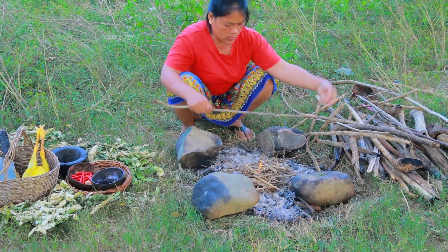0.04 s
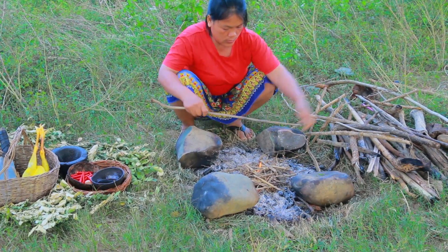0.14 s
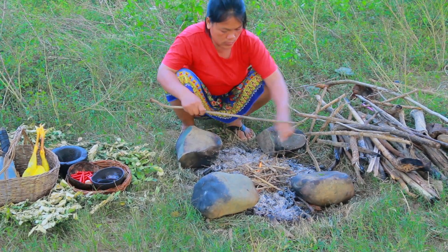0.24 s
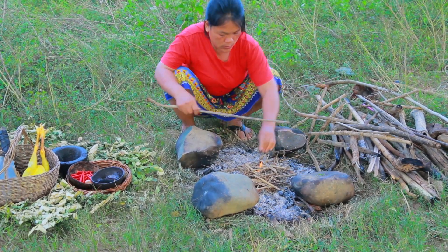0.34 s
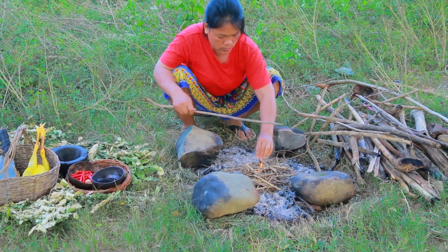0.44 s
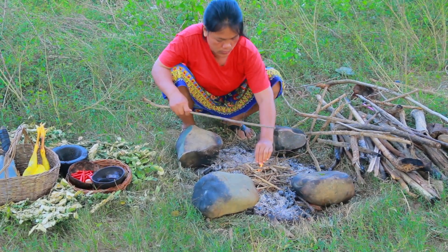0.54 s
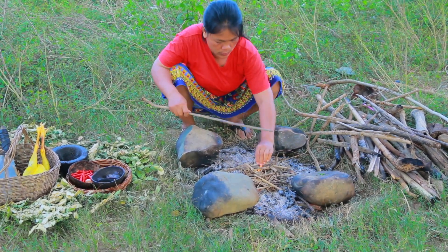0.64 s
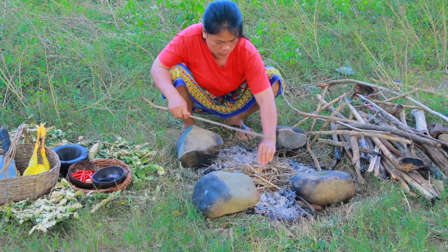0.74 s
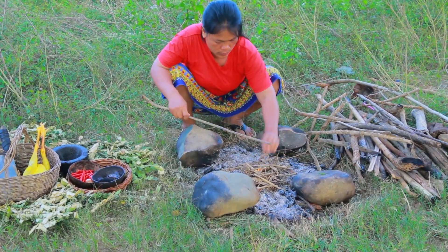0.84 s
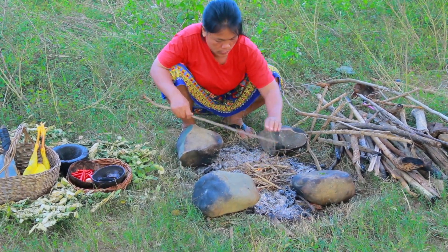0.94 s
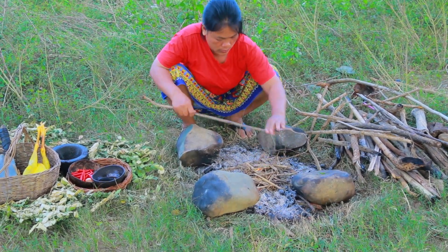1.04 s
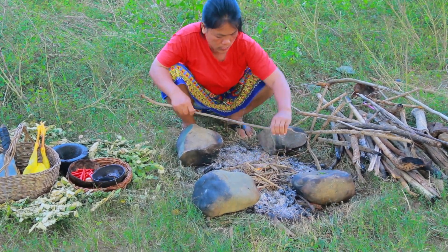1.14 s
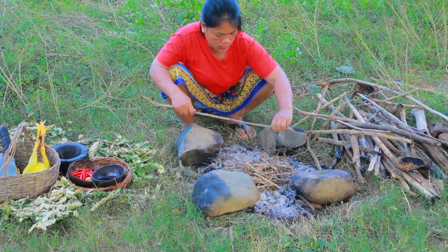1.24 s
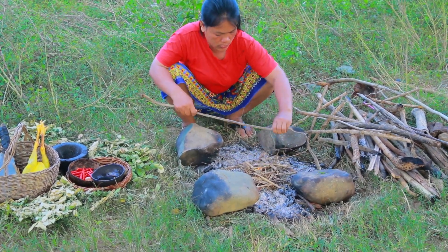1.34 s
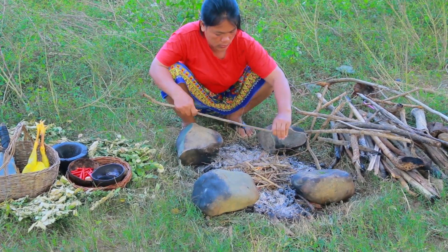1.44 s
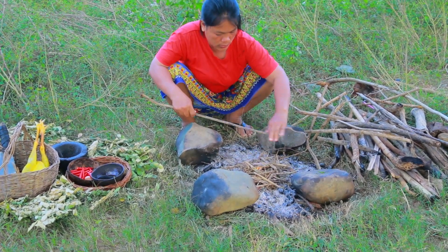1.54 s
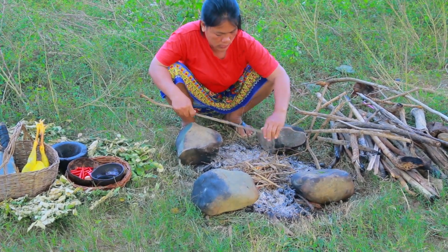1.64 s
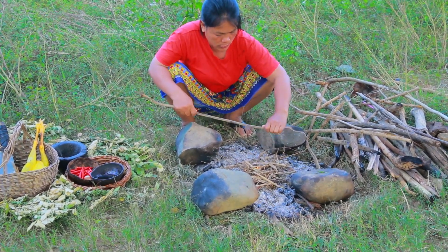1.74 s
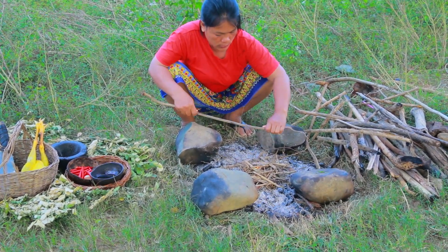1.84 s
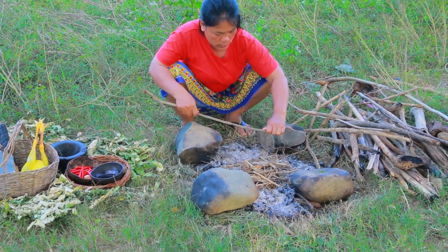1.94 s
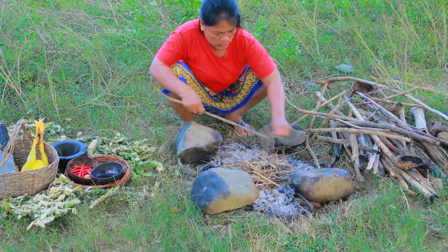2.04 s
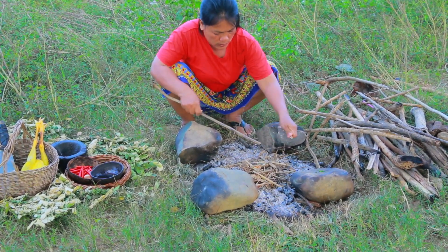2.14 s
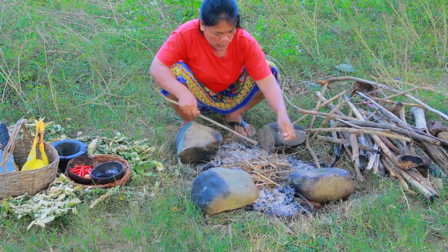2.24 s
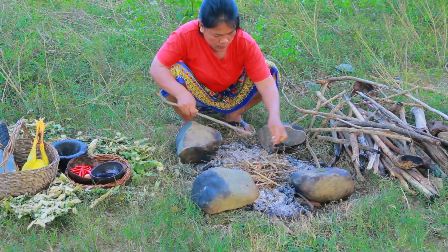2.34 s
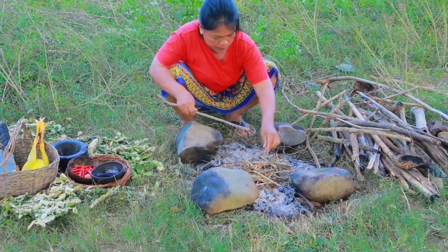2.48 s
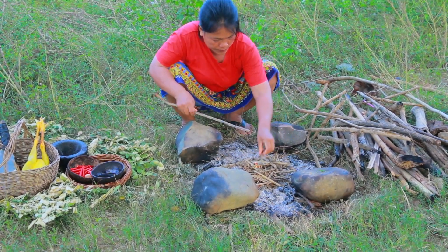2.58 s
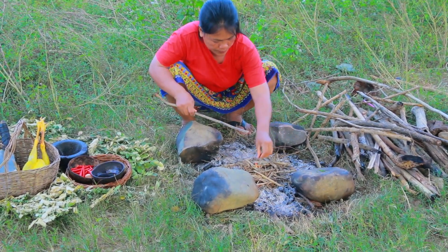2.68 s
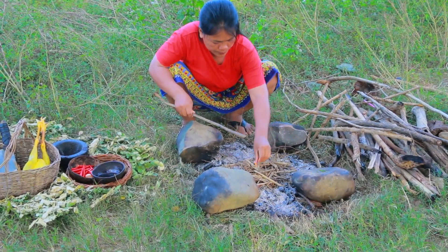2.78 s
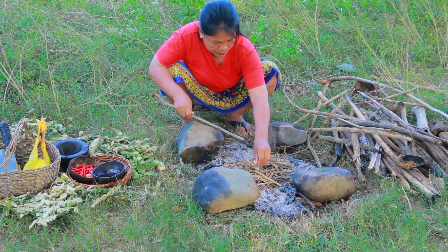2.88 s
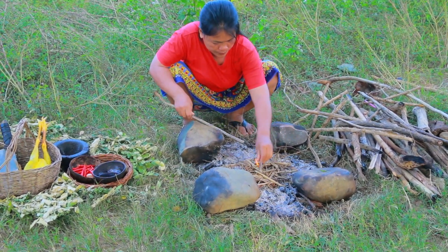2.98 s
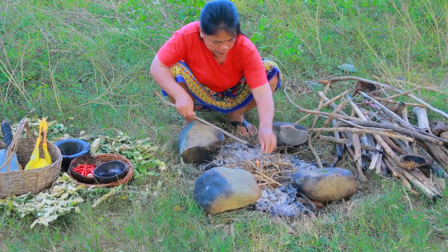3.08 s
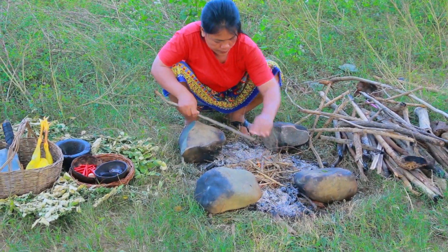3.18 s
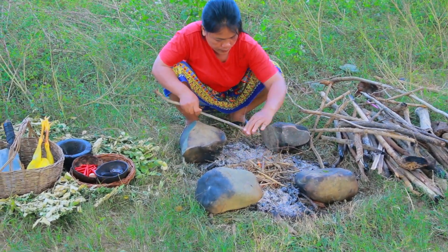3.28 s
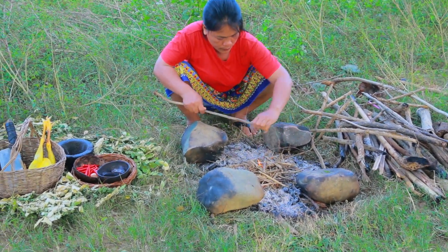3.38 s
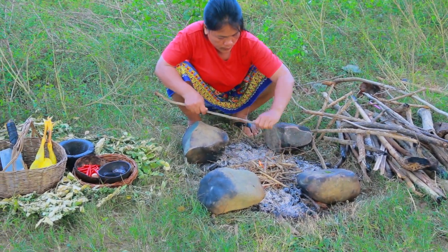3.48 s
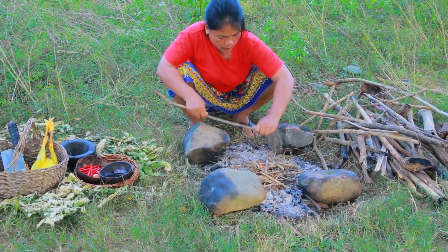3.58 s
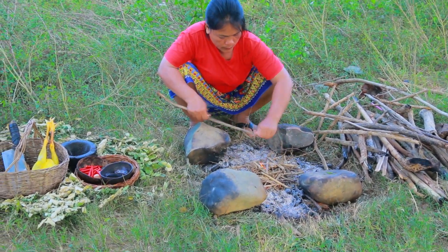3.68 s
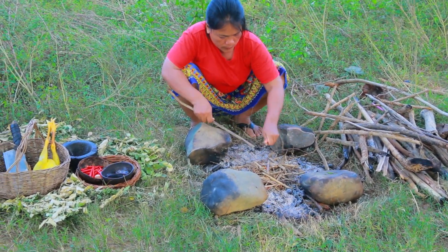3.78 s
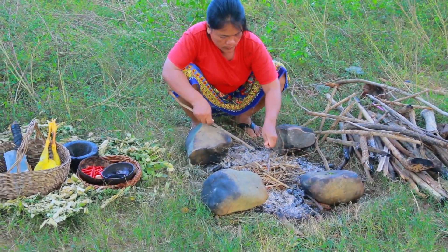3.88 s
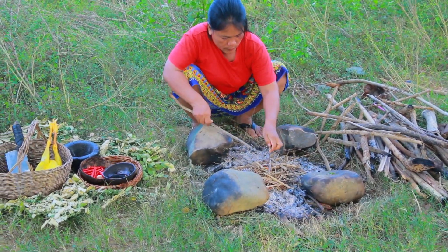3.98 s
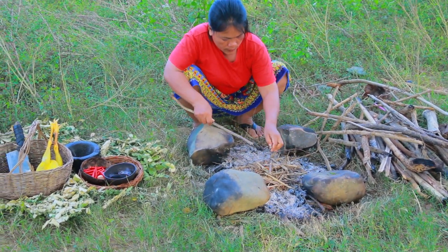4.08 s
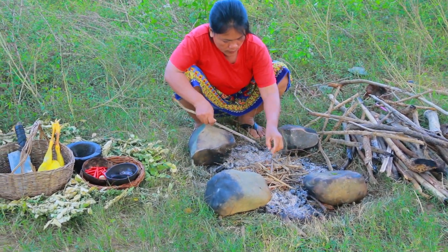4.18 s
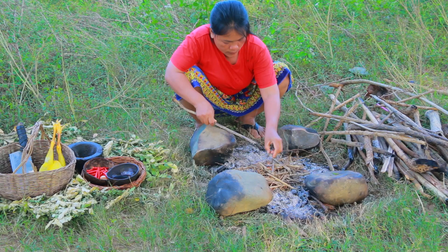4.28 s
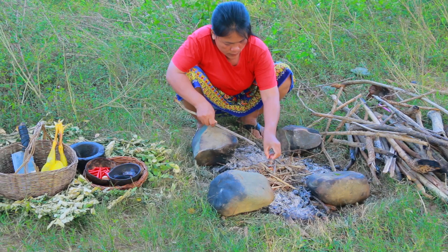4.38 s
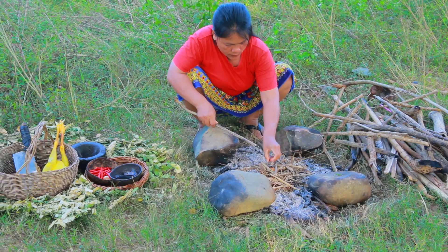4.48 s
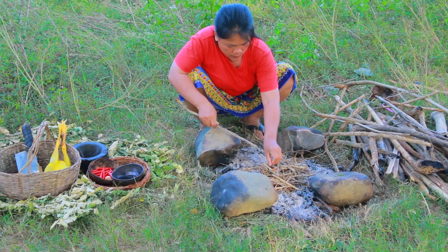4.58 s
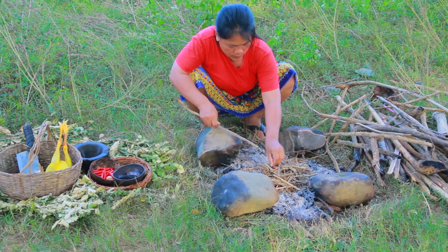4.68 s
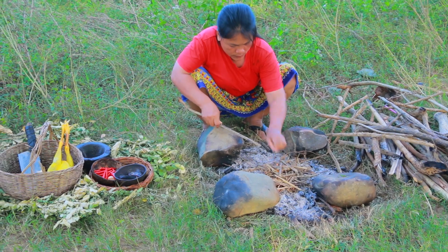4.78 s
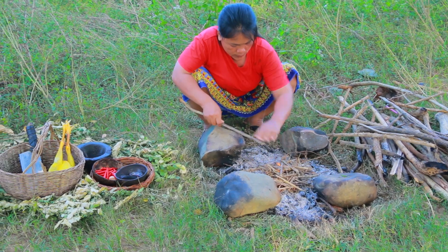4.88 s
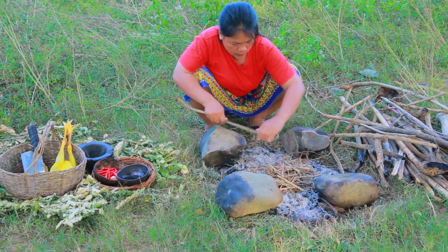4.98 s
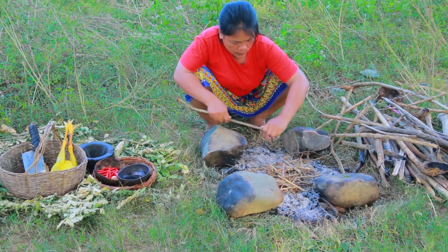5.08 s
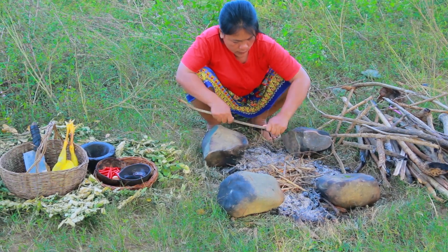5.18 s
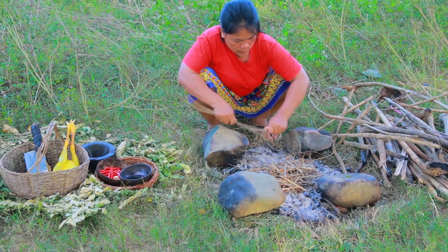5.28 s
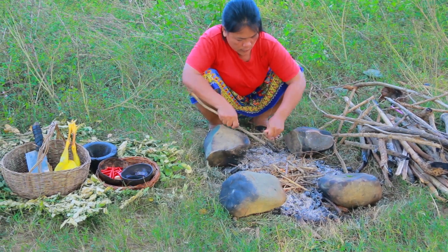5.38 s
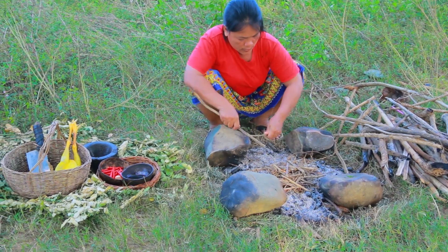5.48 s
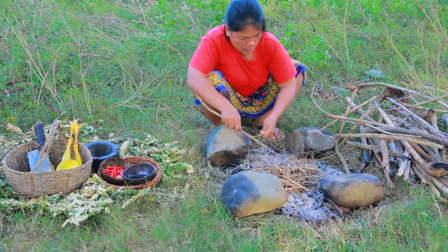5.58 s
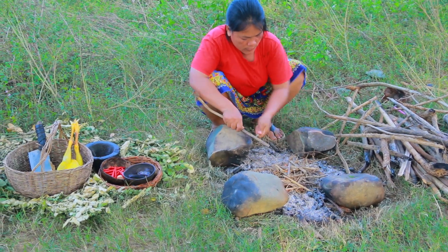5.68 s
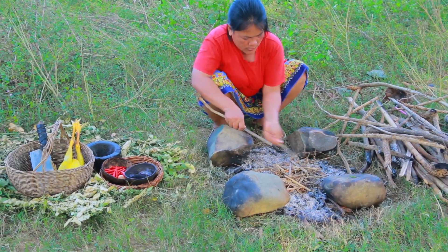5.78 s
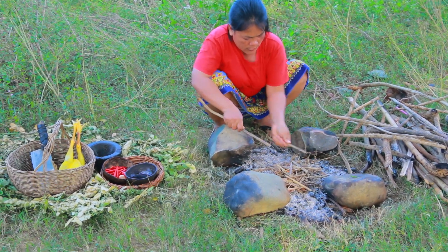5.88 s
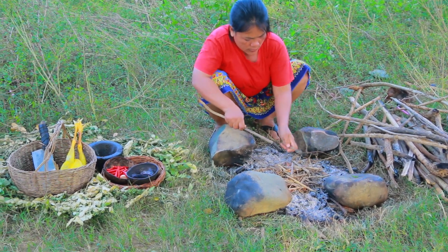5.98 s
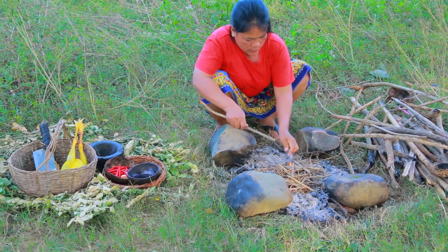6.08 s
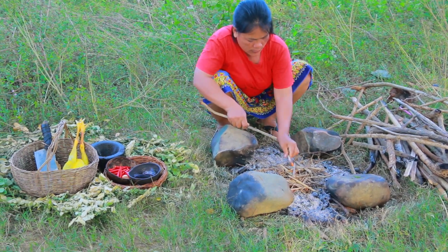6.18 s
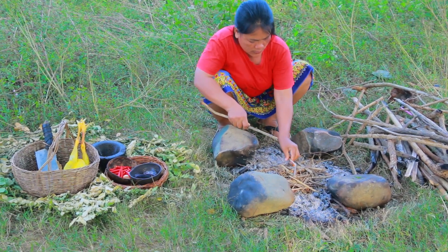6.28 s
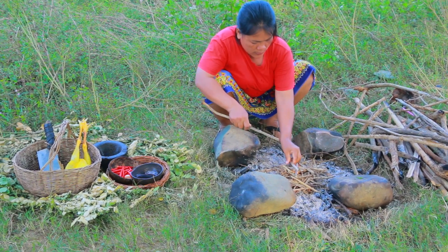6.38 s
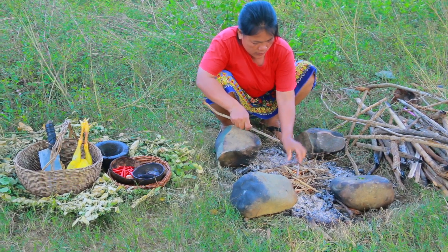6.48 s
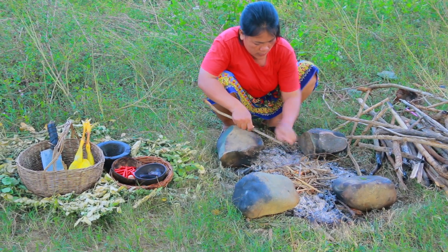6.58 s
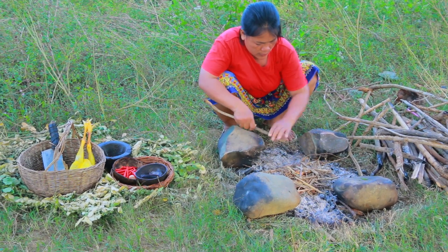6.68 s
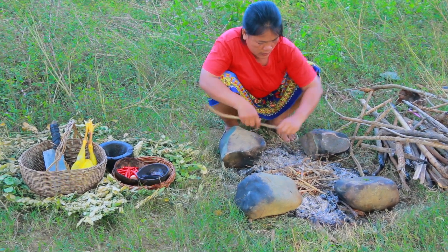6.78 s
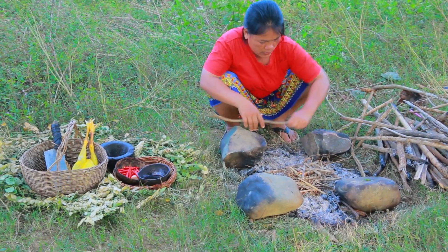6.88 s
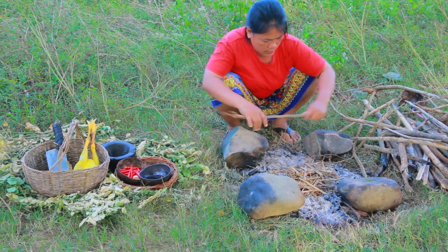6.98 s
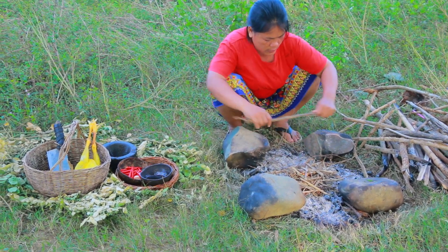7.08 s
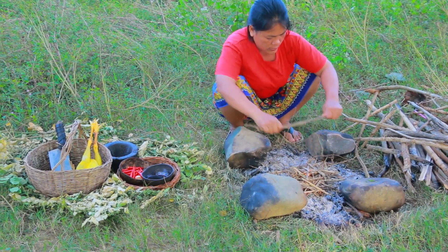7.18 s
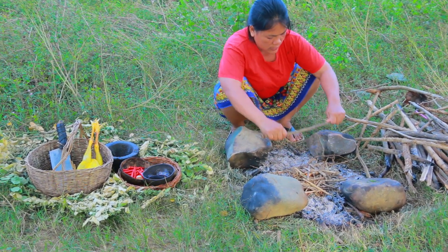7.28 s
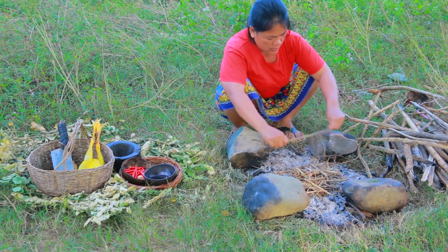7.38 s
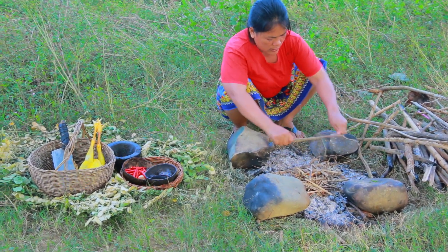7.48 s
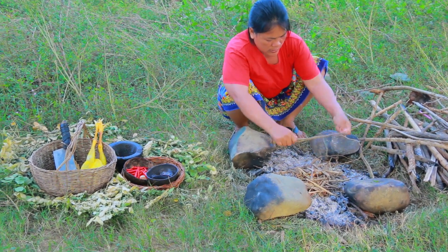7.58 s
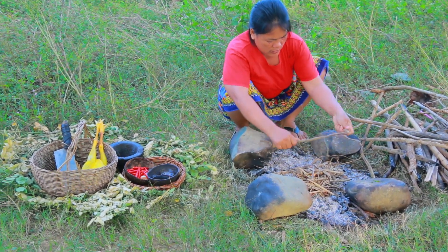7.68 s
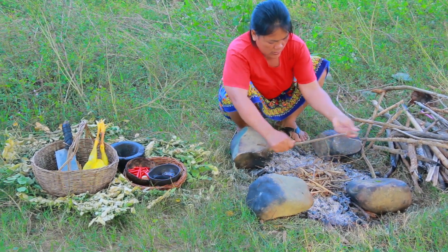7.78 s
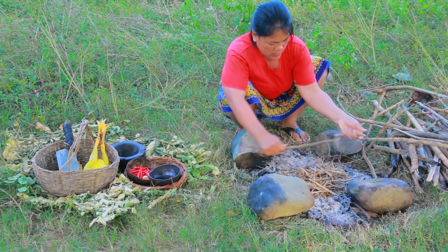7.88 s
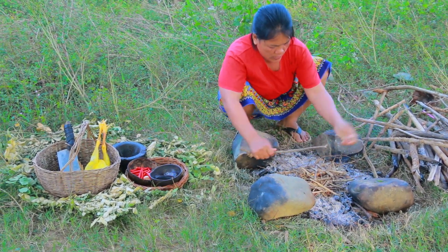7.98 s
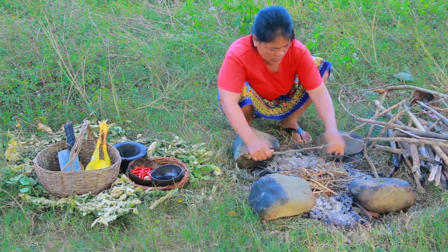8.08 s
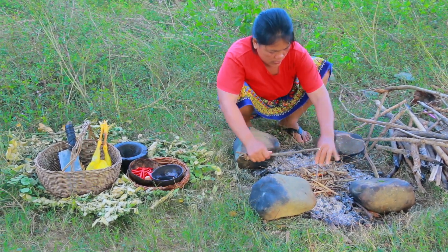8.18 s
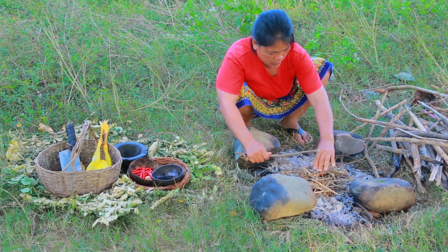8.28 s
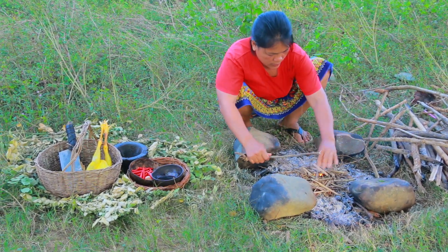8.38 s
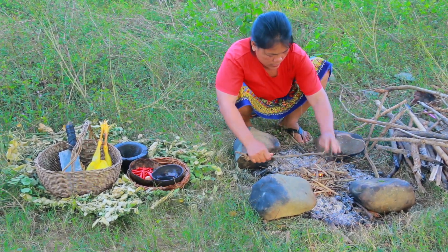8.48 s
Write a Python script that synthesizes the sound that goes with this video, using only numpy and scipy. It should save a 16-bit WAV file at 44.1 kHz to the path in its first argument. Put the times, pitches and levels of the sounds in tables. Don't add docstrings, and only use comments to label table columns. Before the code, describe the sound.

Outdoors in a grassy clearing, dry sticks are broken by hand slightly right of a stereo microphone. Low gusts bump the left side during the first two and a half seconds. A loud snap comes at two seconds, another near 3.7, a strong crack at 5.3 with a softer follower, and the hardest at 7.5. Small splinter ticks surround them over a continuous distant rush.

```python
import sys
import numpy as np
from scipy import signal
from scipy.fft import rfft, irfft, next_fast_len
from scipy.io import wavfile
from scipy.ndimage import uniform_filter1d

SR = 44100
rng = np.random.default_rng(int(sys.argv[2]) if len(sys.argv) > 2 else 0)


def persist_wave(psi):
    counts = np.round(np.clip(psi, -1, 1) * 32767).astype(np.int16)
    wavfile.write(sys.argv[1], SR, np.atleast_2d(counts).T)


def how_loud(loudness_db):
    steps = np.asarray(loudness_db, float) / 20
    return 10 ** steps


N = 376613
STICK_LEAN_DB = -2.6


def rms_one(x):
    return x / np.sqrt(np.mean(x ** 2) + 1e-20)


def in_time(rows):
    return np.interp(np.arange(N) / SR, *np.transpose(rows))


def at_hz(points, hz, column=1):
    points = np.array(points)
    return np.interp(np.log(hz + 1e-9), np.log(points[:, 0]), points[:, column])


def resonance(x, hz, width_hz):
    r = np.exp(-np.pi * width_hz / SR)
    poles = [1, -2 * r * np.cos(2 * np.pi * hz / SR), r * r]
    return signal.lfilter([(1 - r * r) / 2, 0, (r * r - 1) / 2], poles, x)


def butter(x, hz, kind, order=2):
    return signal.sosfilt(signal.butter(order, hz, kind, fs=SR, output="sos"), x)


def sticks():
    break_starts = [
        2.0437,
        3.7395,
        5.3311,
        5.4264,
        7.4572,
        3.743,
    ]
    # level_db before the limiter, tear_ms, fade_db over the tear, left_late_us, scatter_db
    tears = [
        (11, 3, -9.5, 9.5, 4),
        (-8.5, 1.8, 0, 14, 3),
        (-3.5, 2.72, -6.5, 15, 4.5),
        (-6.5, 2.6, -9, 13.7, 5.5),
        (13.5, 3.4, -17, 27, -2),
        (-4.5, 2.64, -8, 8.3, 5),
    ]
    # (hz, db)
    colours = [
        (11994, 1.5, [(1900, -13), (2500, -8), (3300, -6), (4300, -13.5), (5600, -3), (7800, -4), (10200, -3)]),
        (13700, -4.5, [(1500, -3), (4000, -23), (5400, -4.5), (7700, -6), (13800, -21.5)]),
        (11140, -0.5, [(2150, -11), (3550, -24), (5000, -12), (8400, -8), (13000, -23.5)]),
        (15000, -13, [(1500, -20.5), (3500, -16.5), (4900, -4), (6200, -4.5), (9700, 3), (14500, -12.5)]),
        (14660, -1.5, [(1600, -15), (3000, -11.5), (4600, -4), (6300, -5.5), (7900, -4), (13000, 3.5)]),
        (13600, 0, [(1500, -6), (2700, -12), (3200, -13), (7700, -6.5), (13800, -11)]),
    ]
    # start_s, peak_db, splinter_hz, splinter_db
    ticks = [(1.3028, -42, 6300, -9), (1.9674, -37.5, 9500, 0.5), (1.9743, -37.5, 9400, 0),
             (1.983, -24, 9090, -1), (1.9974, -36.5, 9400, 3.5), (2.0158, -29.5, 9360, 2),
             (2.0291, -29, 9450, 6), (2.8074, -49.5, 9000, -6), (3.5594, -48, 9000, -6),
             (3.666, -24, 5500, -15), (3.704, -21, 6900, -16.5), (3.7152, -30, 8000, -7),
             (4.3014, -49.5, 7500, -6), (5.0064, -52.5, 9000, -6.5), (5.0944, -45.5, 9000, -6),
             (5.2931, -19.5, 3210, -19), (5.3177, -23, 8300, -5), (5.3375, -16, 7900, -20.5),
             (5.504, -21.5, 7900, -18), (5.685, -25, 14000, -11), (5.7715, -27.5, 10400, -23.5),
             (7.5968, -28, 4570, -4), (7.8317, -33.5, 9000, -19), (3.7225, -38, 11000, -8),
             (3.731, -40, 9000, -8)]
    rows = []
    for s, (level_db, tear_ms, fade_db, late_us, scatter_db), colour in zip(break_starts, tears, colours):
        rows.append((s, level_db, late_us, scatter_db, tear_ms, fade_db, 2200, *colour))
    for s, level_db, hz, ring_db in ticks:
        tear = (1.3, -4.0, low_edge(hz, ring_db), 15000, -3.0, [(hz, ring_db)])
        rows.append((s, level_db, 12.0, -1.5, *tear))

    luck = rng.random((len(rows), 3, 1024))
    direct, scattered = np.zeros((2, N)), np.zeros(N)
    hz = np.arange(513) * SR / 1024
    lean = how_loud(STICK_LEAN_DB / 2)
    for (s, level_db, late_us, scatter_db, *tear), mine in zip(rows, luck):
        volley, spread = how_loud(level_db) * crack(mine, *tear)
        late = irfft(rfft(volley) * np.exp(-2j * np.pi * hz * min(late_us, 20) / 10 ** 6))
        start = round(s * SR)
        here = slice(start, start + len(volley))
        direct[:, here] += [late * lean, volley / lean]
        scattered[here] += spread * how_loud(scatter_db)
    return direct + signal.fftconvolve(scattered[None], bushes(), axes=1)[:, :N]


def crack(luck, tear_ms, fade_db, low_hz, high_hz, broad_db, modes):
    ms = np.arange(luck.shape[1]) / SR * 1000
    tearing = how_loud(fade_db * np.minimum(ms / tear_ms, 1) - 5.38 * np.maximum(ms - tear_ms, 0))
    sizes = how_loud(-2.5 * np.log(luck[1] + 0.091)) * np.sign(luck[2] - 0.5)
    parting = luck[0] < 15000 / SR
    burst = ms == 0
    fibres = np.array([parting * sizes * tearing + 3.0 * burst, burst])
    # sound, level in the volley (dB), level in the spread (dB)
    parts = [(butter(fibres, [low_hz, high_hz], "band"), broad_db, -3.0)]
    for hz, db in modes:
        duller = how_loud(-1.6 * ms * hz / 10000)
        ring = resonance(resonance(fibres, hz, 0.18 * hz + 220), hz, 0.5 * hz)
        parts.append((duller * ring, db, min(db, -4.0) - 23.0))
    both = 0
    for part, db, spread_db in parts:
        both = both + how_loud([[db], [spread_db]]) * part / np.linalg.norm(part, axis=1, keepdims=True)
    return both / np.max(np.abs(both[0]))


def low_edge(hz, ring_db):
    return min(max(5600 + 330 * ring_db, 2400), 0.67 * hz)


def bushes(seconds=0.4):
    # hz, level_db, t60_s
    scatter = [(1503, -12.5, .2), (3000, 4, 0.2), (5000, 5.5, 0.26), (9000, 3.5, 0.28),
               (12000, 11.5, 0.238), (15000, 2, 0.197)]
    t = np.arange(int(seconds * SR)) / SR
    out, splits = 0, np.geomspace(1000, 17000, 9)
    for low, high in zip(splits, splits[1:]):
        hz = np.sqrt(low * high)
        band = butter(rng.standard_normal((2, len(t))), [low, high], "band")
        out = out + band * how_loud(at_hz(scatter, hz) - 60 * t / at_hz(scatter, hz, column=2))
    near = 1 + 0.794 * how_loud(-60 * t / 0.108)
    lean = how_loud(STICK_LEAN_DB / 2 * np.array([[1], [-1]]))
    onset = np.clip((t - 0.003) / 0.0054, 0, 1)
    return out * near * lean * onset * how_loud(-45.0)


def wind():
    # hz, density_db per Hz
    buffeting = [(12, -43), (20, -15), (75, 7.5), (141, 0.5), (208, -5), (233, -7), (264, -20), (400, -23),
                 (520, -65), (880, -120)]
    size = next_fast_len(N)
    hz = np.arange(size // 2 + 1) * SR / size
    noise = irfft(rfft(rng.standard_normal((2, size))) * how_loud(at_hz(buffeting, hz)), size)[:, :N]
    evened = noise / np.sqrt(uniform_filter1d(noise ** 2, size=1800, axis=1) + 1e-20)
    return evened * how_loud(gusts_db() + np.array([[5.5], [-9.0]]))


def gusts_db():
    # peak_s, level_db
    eddies = [(0.297, -43), (0.35, -38.0), (0.382, -43), (0.477, -46.3), (0.512, -45), (0.558, -43.2),
              (0.814, -37), (0.871, -37), (1.019, -45), (1.129, -35.6), (1.172, -37.2), (1.226, -39.3),
              (1.289, -43), (1.409, -36), (1.475, -29.5), (1.547, -25.5), (1.615, -33), (1.729, -41),
              (1.815, -42), (1.864, -43), (1.92, -42), (1.952, -45.4), (2.332, -36), (2.561, -38.2),
              (.16, -49),
        (1.655, -36),
        (2.25, -48),
        (2.76, -52),
        (2.838, -46.5),
        (8.49, -52),
    ]
    rise_db_per_s, fall_db_per_s, calm_db = 450, 399, -72.5
    t = np.arange(0, N + 64, 64) / SR
    s, db = np.transpose(eddies)[:, :, None]
    swells = how_loud(db - np.maximum(rise_db_per_s * (s - t), fall_db_per_s * (t - s)))
    power = np.sum(swells ** 2, axis=0) + how_loud(2 * calm_db)
    return np.interp(np.arange(N) / SR, t, 10 * np.log10(power))


def rush():
    # hz, density_db per Hz
    rush_colour = [(20, -28.5), (60, -9.5), (120, -9.5), (270, -3.5), (510, -9), (950, -8), (1280, -5.5),
                   (1600, -9), (3200, -18.5), (6000, -29), (9700, -35), (12000, -40.5), (15500, -48),
                   (16000, -84)]
    # centre_hz, width_hz, level_db
    rush_bumps = [(79.8, 11, 2.5), (511.4, 85, -3.5), (920, 59, -2.5), (1610, 94, -2), (2283, 120, -2),
                  (2527, 180, 5.5), (3020, 420, -1.5), (6530, 100, 4.5), (9830, 560, 2.5)]
    # time_s, level_db
    rush_level = [(0.0, -38), (0.81, -38), (4.3, -39.5), (5.25, -39), (5.45, -40), (6.21, -39),
                  (7.75, -39.5), (8.54, -39)]
    # hz, correlation (-1 to 1)
    likeness = [(60, 0.99), (130, 0.983), (290, 0.993), (640, 0.939), (1410, 0.957), (3100, 0.7),
                (6820, 0.33), (15000, -0.36)]
    # hz, difference_db
    port_lean = [(60, 1.5), (240, 1.0), (950, 0.0), (3770, -1.0), (15000, -1.0)]
    echo_ms, echo_share, echo_fade_hz = 1.981, 0.21, 3500
    left_lag_s = 2 / 44100

    size = next_fast_len(N)
    hz = np.arange(size // 2 + 1) * SR / size
    mid, side = rfft(rng.standard_normal((2, size)))
    alike = np.clip(at_hz(likeness, hz), 0, 1)
    common, apart = np.sqrt(1 + alike) * mid, np.sqrt(1 - alike) * side
    left = (common + apart) * np.exp(-2j * np.pi * hz * left_lag_s)
    right = common - apart
    lean = how_loud(at_hz(port_lean, hz) / 2)
    comb = 1 - echo_share * np.exp(-hz / echo_fade_hz - 2j * np.pi * hz * echo_ms / 1000)
    colour_db = at_hz(rush_colour, hz)
    for centre_hz, width_hz, db in rush_bumps:
        colour_db = colour_db + db * np.exp(-((hz - centre_hz) / width_hz) ** 2)
    both = irfft(how_loud(colour_db) * comb * np.array([left * lean, right / lean]), size)[:, :N]
    return how_loud(in_time(rush_level) + 1.0 + 0.14 * drift(8.4)) * rms_one(both)


def drift(rate):
    r = np.exp(-80 * np.pi * rate / SR)
    slow = signal.lfilter([1], [1, -2 * r, r * r], rng.standard_normal(N // 40 + 2002))[2000:]
    return np.interp(np.arange(N) / 40, np.arange(len(slow)), rms_one(slow))


def scene():
    return sticks() + wind() + rush()


def low_pass(x):
    return signal.sosfilt(signal.butter(12, 16870, fs=SR, output="sos"), x)


def record(dry):
    ceiling_db, recover_db_per_s, attack_s = 4, 184, 0.00013
    peak_db = 20 * np.log10(np.max(np.abs(dry), axis=0) + 1e-9)
    over_db = np.maximum(peak_db - ceiling_db, 0)
    ramp = recover_db_per_s * np.arange(N) / SR
    held_db = np.maximum.accumulate(over_db + ramp) - ramp
    quick = np.exp(-1 / (attack_s * SR))
    held_db = signal.lfilter([1 - quick], [1, -quick], held_db)
    limited = np.clip(dry * how_loud(-held_db), -1, 1)
    edge = signal.cheby2(12, 45, 16300, fs=SR, output="sos")
    return low_pass(signal.sosfilt(edge, limited))


dry = scene()
out = record(dry)
persist_wave(out)
```